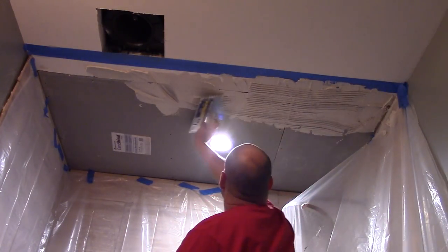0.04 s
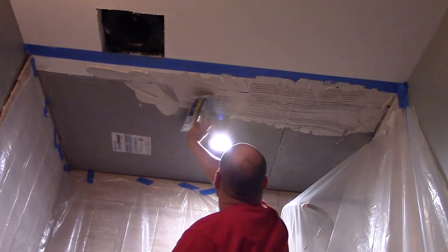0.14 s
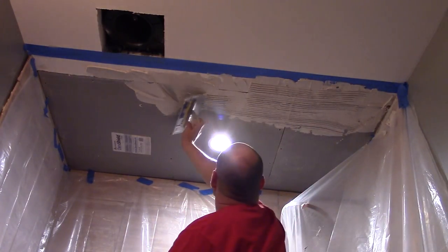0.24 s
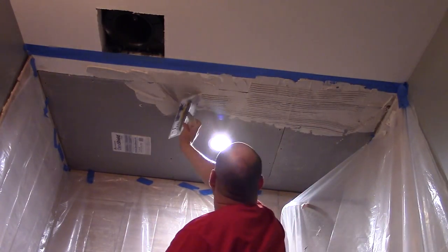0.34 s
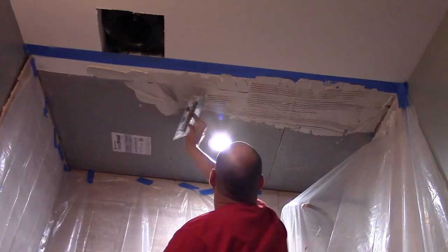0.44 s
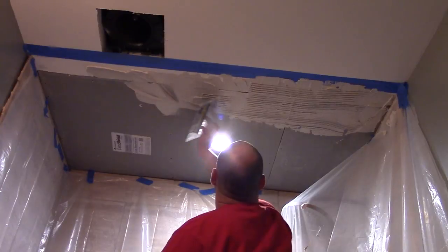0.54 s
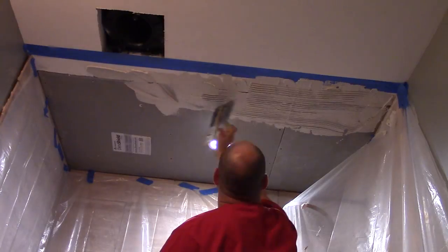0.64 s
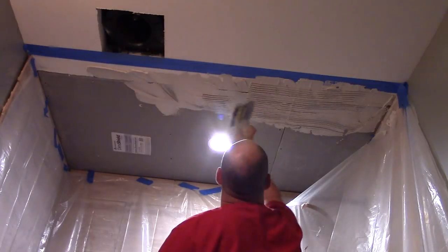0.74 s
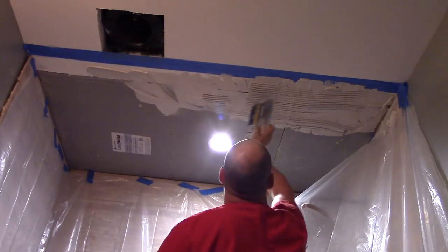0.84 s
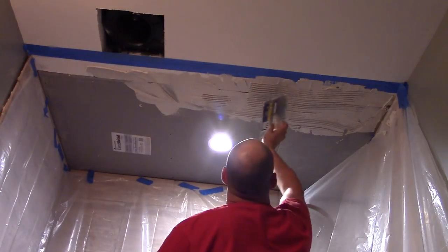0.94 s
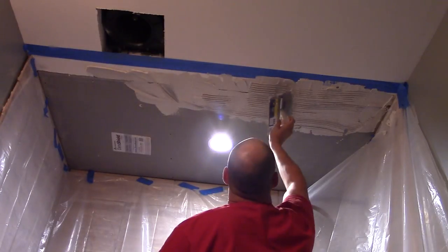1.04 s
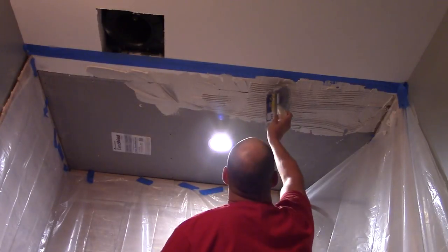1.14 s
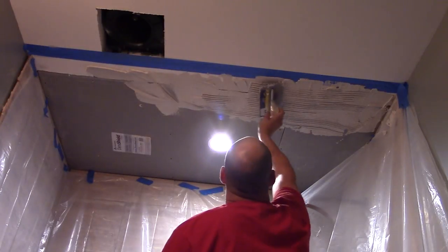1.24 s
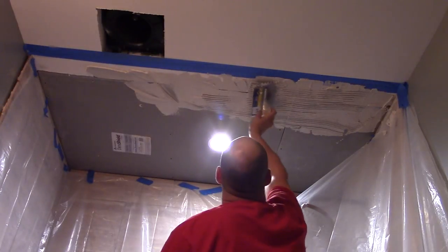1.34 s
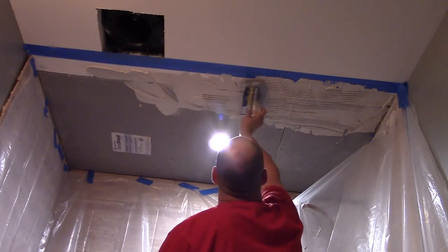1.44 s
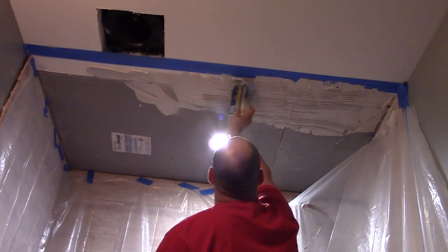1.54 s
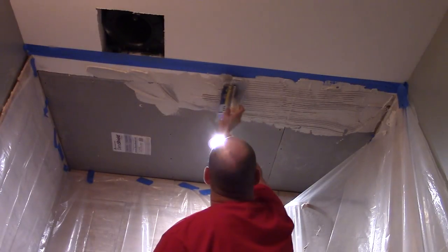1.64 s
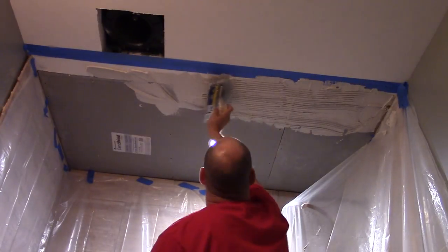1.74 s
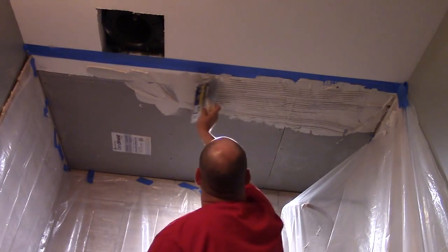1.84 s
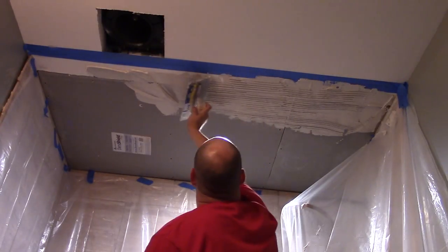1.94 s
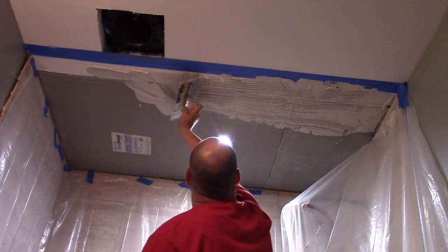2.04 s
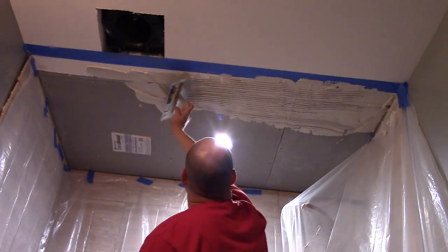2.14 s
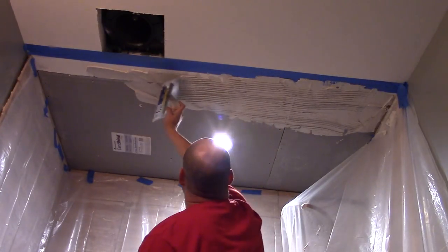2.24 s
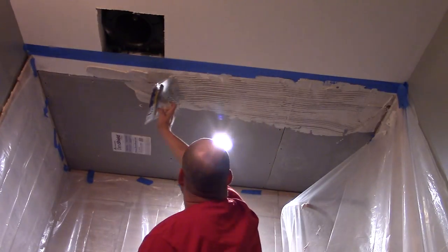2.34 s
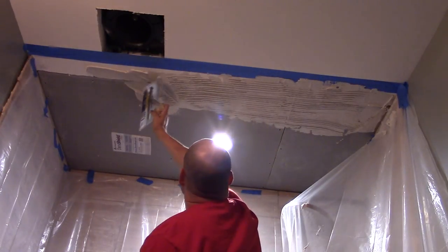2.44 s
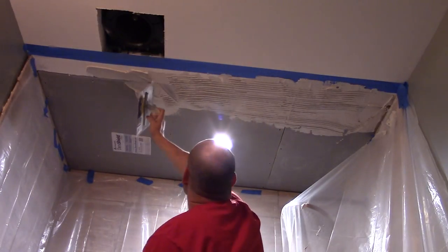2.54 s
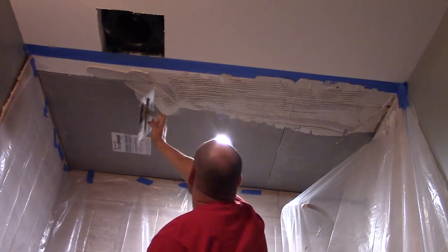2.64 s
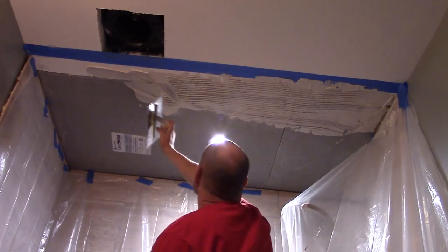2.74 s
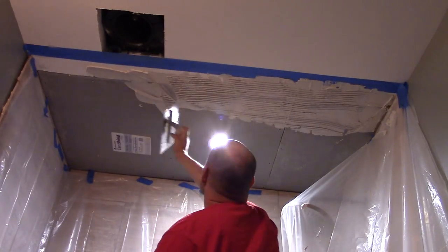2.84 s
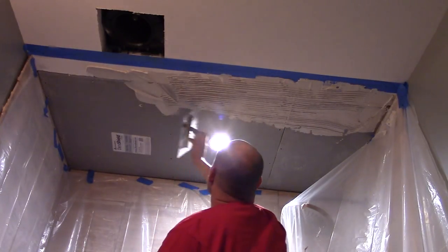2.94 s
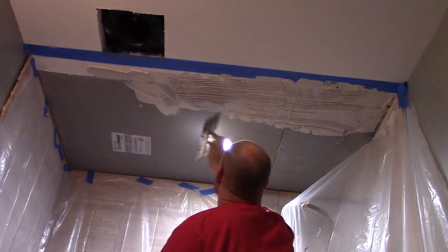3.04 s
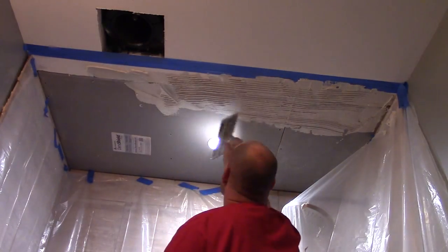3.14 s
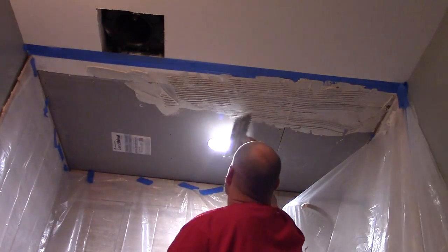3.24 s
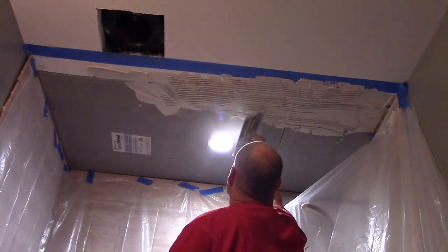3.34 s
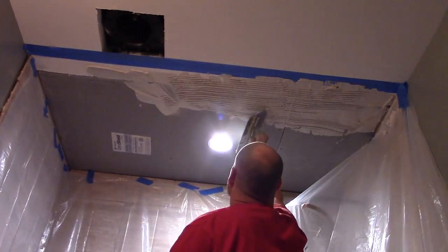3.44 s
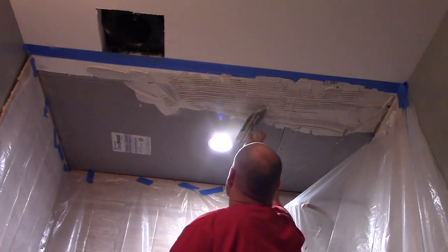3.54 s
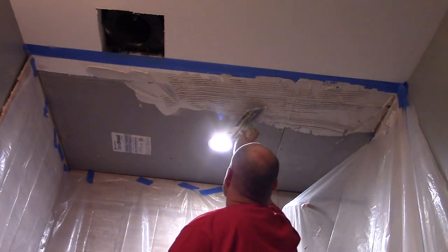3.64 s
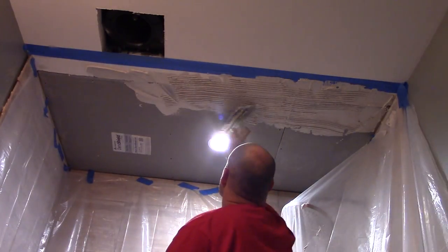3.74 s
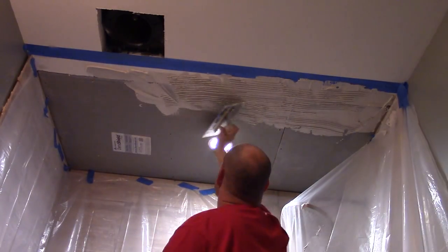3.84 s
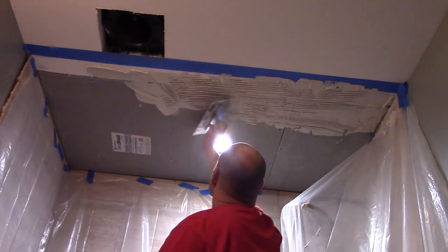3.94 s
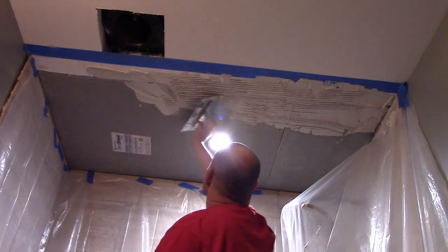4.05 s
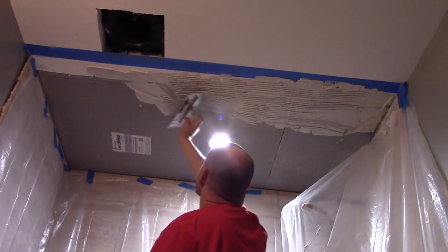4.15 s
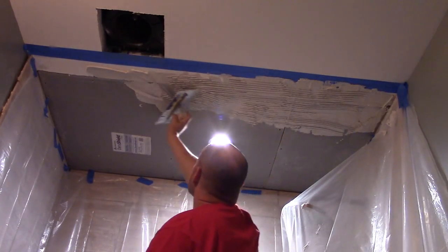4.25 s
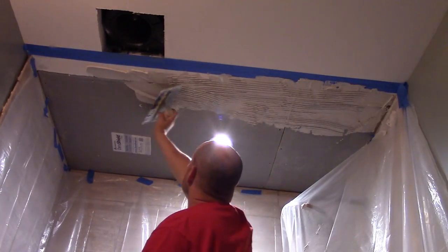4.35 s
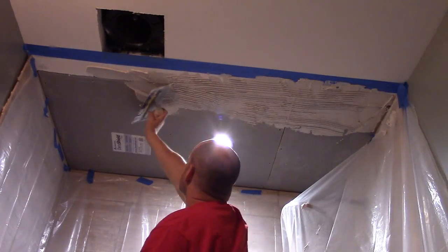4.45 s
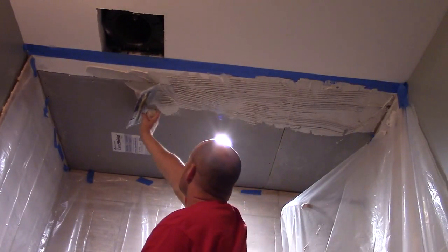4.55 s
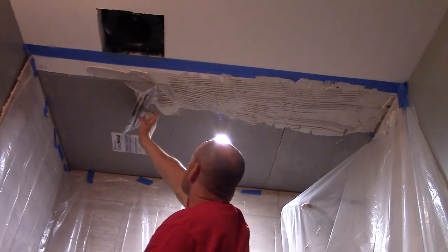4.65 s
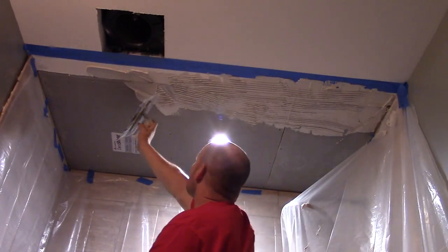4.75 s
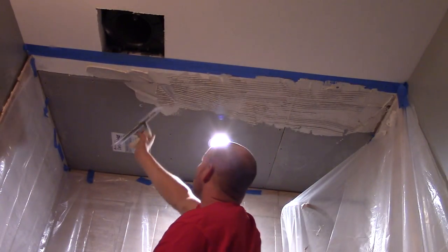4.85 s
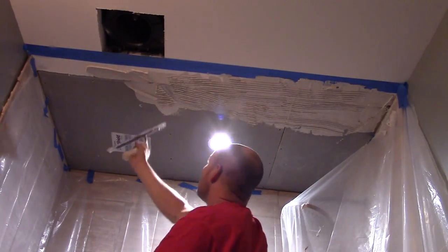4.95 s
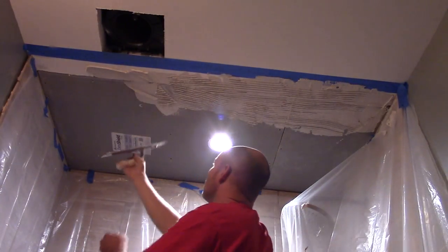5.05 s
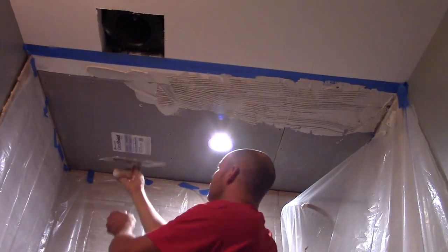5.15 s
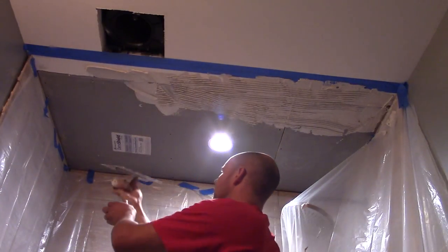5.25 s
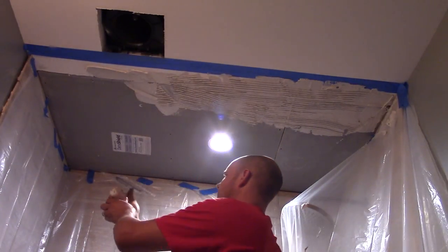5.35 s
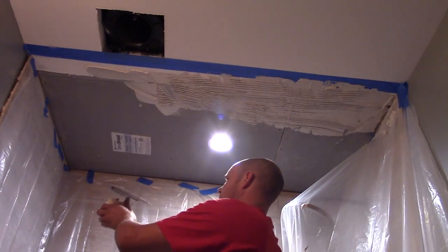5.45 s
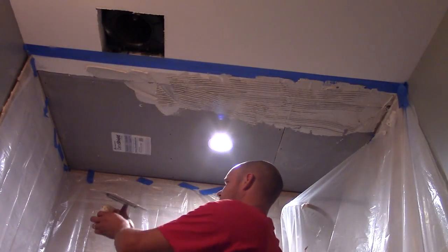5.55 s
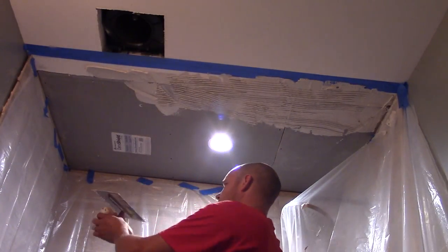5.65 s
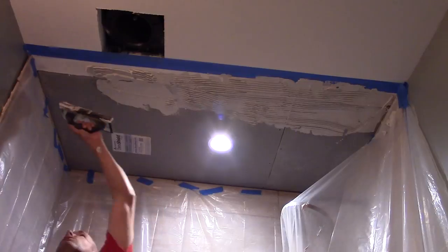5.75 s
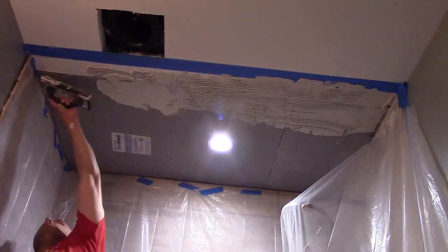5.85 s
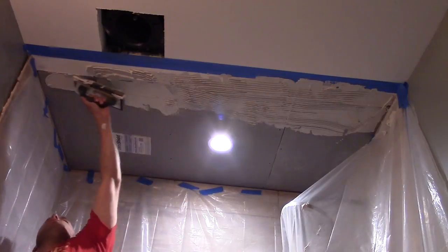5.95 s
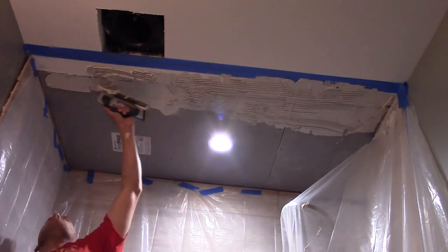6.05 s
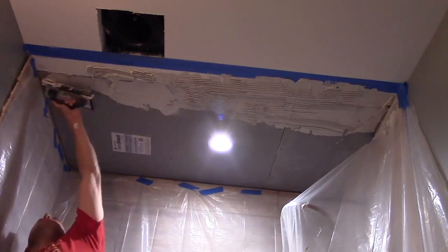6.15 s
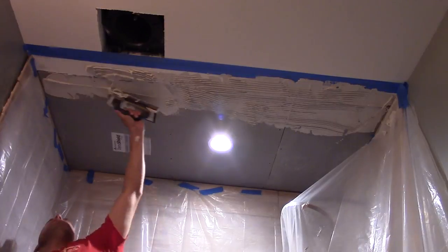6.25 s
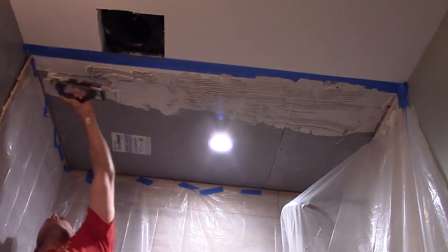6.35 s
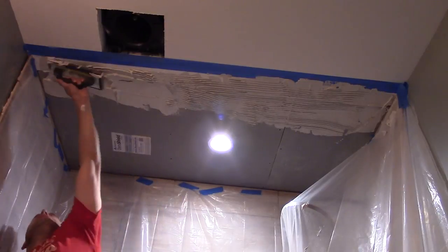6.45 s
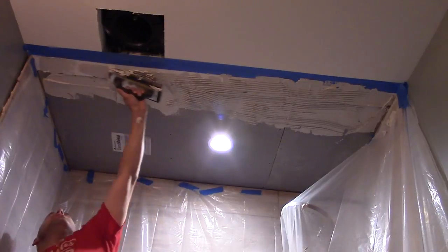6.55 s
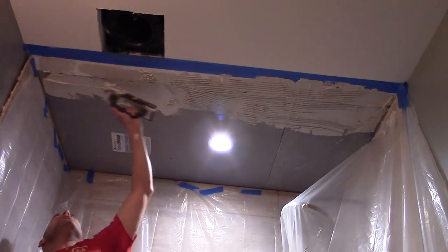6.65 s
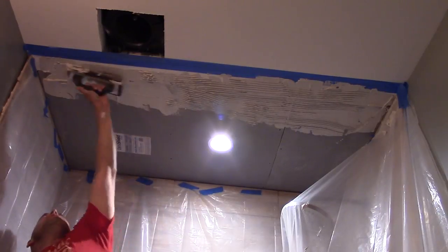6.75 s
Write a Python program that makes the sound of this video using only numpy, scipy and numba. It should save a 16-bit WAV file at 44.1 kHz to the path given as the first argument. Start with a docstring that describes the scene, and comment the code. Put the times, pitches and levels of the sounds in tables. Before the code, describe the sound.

Indoor work sound: coarse, sandy trowel scraping with a metallic midrange ring and boxy board resonance, each stroke fading into a thinner singing lift. Wet crackling smacks and blade touches fill the pauses over soft, steady duct air. After the third stroke come a few more touches, then an abrupt switch to sped-up sound, pitched-up airy hiss and very short irregular rasps. Close hard walls, modest distance, little stereo width.

```python
"""Wet mortar is spread with a notched steel trowel on a ceiling board in a small bathroom.
Low ventilation rush, coloured noise with duct resonances, runs throughout, with a faint high whine until the cut.
Three strokes: sand clicks under the teeth rasp, ring the blade and drum the board; noise bursts smack between.
At 5.75 s a hard cut to fast-forward: higher-pitched rush, scrapes shrunk to brief bright rasps."""
import sys
import numpy as np
from scipy import signal
from scipy.fft import rfft, irfft
from scipy.io import wavfile
from scipy.ndimage import uniform_filter1d
from numba import njit

SR = 44100
rng = np.random.default_rng(int(sys.argv[2]) if len(sys.argv) > 2 else 0)


def output_pcm(signal):
    """Save a mono or channel-first signal as 16-bit PCM at the path in sys.argv[1].

    Samples are clipped to [-1, 1] before scaling.
    """
    pcm = np.clip(np.atleast_2d(signal).T, -1, 1) * 32767
    wavfile.write(sys.argv[1], SR, np.round(pcm).astype(np.int16))


N = 299439
T = np.arange(N) / SR
HZ = np.maximum(np.arange(N + 1) * SR / (2 * N), 1)

# Spectral tables feed power-normalized filters: only their relative levels count.
# ventilation rush, normal and fast-forward: (frequency [Hz], density [dB per Hz])
RUSH_SPECTRUM = [(25, -42), (45, -52), (70, -17.5), (95, -13), (125, -6), (190, -3.5), (300, -1.5),
                 (450, -4), (750, -9.5), (1100, -17.5), (2000, -26.5), (3800, -31), (7000, -40),
                 (16000, -50)]
FAST_RUSH_SPECTRUM = [(30, -40), (150, -37), (230, -42), (340, -18), (480, -22), (620, -3.5), (950, -6.5),
                      (1150, -3.5), (2200, -4.5), (2700, -9), (3550, -9), (4000, -13.5), (6300, -22),
                      (12000, -29.5), (16000, -28)]
# duct resonances before pitch scaling: (frequency [Hz], width [Hz], relative level [dB])
DUCT_MODES = [(72, 24, -15.5), (125.8, 13.4, -12), (162.4, 14.2, -3), (192.1, 11.3, 0.5), (276.3, 20, -7),
              (429, 38, -13), (702, 25, -12)]
RUSH_DB, FAST_RUSH_DB = -43, -39  # before the air and duct gains
WHINE_HZ, WHINE_DB = 10960, -85
# side signal of trowel, rush and fast rush: (frequency [Hz], side re mid [dB])
TROWEL_SIDE = [(60, -22), (110, -24), (200, -33), (380, -32.5), (700, -30.5), (1290, -30), (2380, -28.5),
               (4400, -15), (8120, -13), (15000, -12.5)]
RUSH_SIDE = [(70, -15), (130, -21.5), (700, -19), (1800, -11), (7000, -11.5), (12000, -17)]
FAST_RUSH_SIDE = [(100, -6), (190, -9), (300, -25), (470, -11), (750, -26), (1900, -29), (4600, -24),
                  (7500, -15), (12000, -11)]

FAST_START_S, SPEED_UP = 5.749, 5
# fast-forward scrapes: (middle [s], half length [s], level [dB], tilt [dB per octave])
FAST_SCRAPES = [(5.768, 0.022, -42, -1), (5.821, 0.022, -36, 2), (5.881, 0.021, -34.5, 0),
                (5.93, .025, -47, -2), (6.028, 0.02, -42, -6.5), (6.06, .012, -43, 7),
                (6.157, .005, -43, 1), (6.3, 0.021, -29.5, -4), (6.568, 0.013, -26.5, -4),
                (6.614, 0.012, -37.5, -5), (6.64, 0.055, -41, -6.5)]

# board flexing under the hand: (middle [s], half length [s], level [dB], frequency [Hz])
FLEXES = [(1.79, .05, -47, 80), (1.85, 0.54, -51, 143), (1.95, 0.38, -45.5, 231), (2.0, .5, -57, 80),
          (2.453, 0.051, -38.5, 150)]

# mortar smacks, light blade touches: (time [s], drive peak [dB], centre [Hz], decay [s])
SMACKS = [(0.9444, -46, 2790, .018), (0.9824, -43, 3370, 0.059), (1.061, -34.5, 3880, 0.027),
          (1.211, -29, 2400, 0.051), (2.704, -34, 3750, 0.011), (3.193, -37.5, 4050, .016),
          (3.225, -29, 5200, .011), (3.2854, -32.5, 5330, 0.018), (3.4164, -37, 2310, 0.02),
          (3.449, -28, 5770, 0.031), (3.595, -24.5, 2910, 0.011), (3.6416, -28, 5230, 0.0092),
          (4.7614, -23, 5700, .015), (4.9472, -38.5, 2170, 0.024), (5.168, -34.5, 3080, .015),
          (5.532, -35.5, 3630, 0.013)]
# smack crackle colour: (frequency [Hz], density [dB per Hz])
SMACK_SPECTRUM = [(500, 7.5), (1200, 0.5), (2500, 0), (4500, -3.5), (5700, -3.5), (8000, -7),
                  (12000, -13.5), (16000, -22)]
SMACK_RISE_S, SQUELCH_GAIN = 0.0058, 0.46

# scrape colours, teeth, fine hiss and board: (frequency [Hz], density [dB per Hz])
RASP_SPECTRUM = [(900, -43), (1500, 0.5), (1950, -2), (2130, -2), (2500, 0.5), (3200, -0.5), (3850, -0.5),
                 (4200, -3), (4350, -3.5), (5600, -14.5), (8000, -28.5)]
HISS_SPECTRUM = [(3500, -27), (5200, -2.5), (6300, 0.5), (7400, -1), (9000, -7), (11300, -6.5),
                 (13800, -15.5), (16000, -19)]
BOARD_SPECTRUM = [(30, -58), (55, -38), (80, -27), (110, -32), (160, -20), (235, -10), (420, -3.5),
                  (530, -2), (760, 2.5), (950, 1.5), (1300, 0), (2200, -25)]
# narrow resonances of board and alcove before pitch scaling: (frequency [Hz], relative level [dB])
BOARD_MODES = [(268, -5), (325, -6), (392, 0.5), (450, 2.5), (620, 3), (715, -4), (780, 6), (838, 0.5),
               (894, -9), (924, 6), (988, 0), (1115, 0), (1165, 4)]
# hollow board note, left when the hand lets up
HOLLOW_HZ, HOLLOW_WIDTH_HZ, HOLLOW_DB = 427, 200, 1
# blade bending modes: (multiple of blade resonance [-], width before damping [Hz], level [dB])
BLADE_MODES = [(0.931, 113.4, 0), (0.997, 89.8, 1.5), (1.081, 130, 1), (2.1, 260, -17), (3.5, 220, -17.5)]
BLADE_WANDER = .02  # relative detuning by the grip

# strokes: (teeth bite [s], attack [s], hand eases [s], release [s], hiss drive re pressure [dB],
#           blade resonance off the paste [Hz], extra ring on lifting [dB])
STROKES = [(0.0, .01, 0.33, 0.19, -1.5, 1286, 15), (1.303, 0.02, 2.4274, 0.24, -3, 1234, 8.5),
           (3.764, .17, 4.62, .25, -5, 1185, 6)]
# hand curve of each stroke:
# (time [s], pressure [dB], board drive re pressure [dB], held blade resonance [Hz])
HAND_1 = [(0.0, -18.5, -2.5, 1320), (0.044, -21, -1, 1212), (0.236, -25, -5, 1256),
          (0.324, -23.5, -5, 1325), (0.345, -21.5, -4.5, 1240)]
HAND_2 = [(1.32, -30, -2, 1250), (1.364, -29, -5, 1300), (1.586, -26.5, -4, 1250), (1.74, -23.5, -5, 1337),
          (1.854, -19.5, -5.5, 1297), (1.974, -23.5, -4.5, 1220), (2.206, -22, -2, 1230),
          (2.342, -23, -3.5, 1146), (2.4, -23.5, -2, 1350)]
HAND_3 = [(3.77, -20, -7, 1167), (3.842, -19.5, -4, 1196), (3.98, -23, -0.5, 1190),
          (4.138, -22, -3.5, 1278), (4.236, -21, -5, 1240), (4.324, -21.5, -5, 1365),
          (4.416, -19.5, -4.5, 1150), (4.62, -27, -3, 1247)]
# teeth skimming the paste:
# (middle [s], half length [s], rasp drive [dB], ring drive re rasp [dB], blade resonance [Hz])
SKIMS = [(1.25, .037, -39, -2, 1596), (3.684, 0.042, -47, 6, 1185), (4.777, 0.028, -42, -13, 1190)]
CONTACT_RANGE_DB, RELEASE_EXPONENT = 40.5, 1.38  # drop per attack or release time; slow start of lift
BOARD_LINGER_DB, HISS_LOSS_DB = 9.5, -7  # re pressure over one release, as the blade slows
REGRIP_S = 0.037  # held pitch to free pitch
FREED_SHARE = 0.53  # share of the release the steel takes to come free
RING_OFFSET_DB = 1.5  # ring drive re board drive
RING_DAMPING, FIRM_DB = 0.28, -24  # dB soaked up by the paste per dB of pressure above FIRM_DB
LANDING_S, LANDING_DB = 1.299, -31  # blade set flat on the board; drive level
RASP_DB = 0.54
TOP_HZ = 15900


def undb(db):
    """Decibels to gain."""
    return 10 ** (np.asarray(db) / 20)


def unit(x):
    """Scale to rms 1."""
    return x / np.sqrt(np.mean(x ** 2))


def shape(points):
    """Gain over HZ, interpolated in dB on log frequency."""
    hz, db = np.transpose(points)
    return undb(np.interp(np.log(HZ), np.log(hz), db))


def resonance(hz, width_hz):
    """Response of one damped mode, 1 at its centre."""
    return 1 / (1 + 1j * (HZ / hz - hz / HZ) * hz / width_hz)


def colour(x, response):
    """Filter by a frequency response."""
    return irfft(rfft(x, 2 * N) * response)[:N]


def radiate(x, response):
    """Colour a broadband drive, keeping its power."""
    return colour(x, response / np.sqrt(np.mean(np.abs(response) ** 2)))


def walk(rate_hz):
    """Random levels held 1 / rate_hz s, smoothed twice; spread near 1."""
    hold = int(SR / rate_hz)
    steps = np.repeat(rng.standard_normal(N // hold + 1), hold)
    return 1.3 * uniform_filter1d(uniform_filter1d(steps, hold), hold)[:N]


def swell(middle_s, half_s):
    """Bell-shaped rise and fall."""
    return np.exp(-((T - middle_s) / half_s) ** 2)


@njit
def moving_band(x, hz, width_hz):
    """State-variable band-pass whose centre moves every sample."""
    y, band, low = np.empty(len(x)), 0., 0.
    for i in range(len(x)):
        g, k = np.tan(np.pi * hz[i] / SR), width_hz / hz[i]
        v = (band + g * (x[i] - low)) / (1 + g * (g + k))
        band, low, y[i] = 2 * v - band, low + 2 * g * v, k * v
    return y


def grit(rate_hz, spread_db, paste=0.36):
    """Randomly timed clicks of uneven sand grains over the smooth noise of smeared paste."""
    size = undb(spread_db * np.minimum(rng.exponential(size=N), 5))
    clicks = (rng.random(N) < rate_hz / SR) * size * rng.choice([-1, 1], N)
    return unit(unit(clicks) + paste * rng.standard_normal(N))


def room(x, t60_s=.3, gap_s=.004, size=8192):
    """Short dense tail of close bare walls; its pattern changes as hand and body move."""
    t = T[:SR // 2]
    decay = undb(-60 * t / t60_s) * (t > gap_s)
    window = np.sin(np.pi * np.arange(size) / size)
    padded = np.pad(x, (size, 2 * size + len(t)))
    out = np.zeros(len(padded))
    # a fresh tail for every half-overlapped block
    for i in range(0, N + size, size // 2):
        echo = signal.fftconvolve(padded[i:i + size] * window, decay * rng.standard_normal(len(t)))
        out[i:i + len(echo)] += echo
    return out[size:size + N] / np.sqrt(np.sum(decay ** 2))


def indoors(x, t60_s, wet_db):
    """Direct sound plus room tail, at the same total power."""
    return (x + undb(wet_db) * room(x, t60_s)) / np.sqrt(1 + undb(wet_db) ** 2)


def spread(mid, side_levels):
    """Add a faint, diffuse side signal, with its level set per frequency."""
    side = colour(room(mid, t60_s=.13, gap_s=.0005, size=4096), shape(side_levels))
    return np.array([mid + side, mid - side])


def rush(spectrum, pitch, air_db, duct_db):
    """Moving air as slowly varying noise, plus noise through pitch-scaled duct resonances."""
    duct = sum(undb(db) * resonance(hz * pitch, width_hz * pitch) ** 2
               for hz, width_hz, db in DUCT_MODES)
    level = undb(air_db + 0.61 * walk(5.2))
    air = level * radiate(rng.standard_normal(N), shape(spectrum))
    return air + undb(duct_db) * radiate(rng.standard_normal(N), duct)


def whine():
    """Faint electronic whine: very narrow noise high in the treble, wavering."""
    return undb(WHINE_DB) * radiate(rng.standard_normal(N), resonance(WHINE_HZ, 300) ** 2)


def board_modes(pitch):
    """Summed response of the board and alcove modes, pitch-scaled."""
    return sum(undb(db) * resonance(hz * pitch, 26 * pitch) ** 2 for hz, db in BOARD_MODES)


def fast_scrapes(low_hz=1300):
    """Sped-up scrapes: brief rasps, board modes pitched up, room tail shrunk."""
    out = 0
    sand = grit(rate_hz=5000, spread_db=0.5)
    low_cut = 1 / (1 + (low_hz / HZ) ** 4)
    body = (1 + 0.39 * np.abs(board_modes(SPEED_UP))) * low_cut
    for s, half_s, db, tilt_db in FAST_SCRAPES:
        tilt = undb(tilt_db * np.log2(HZ / low_hz))
        out = out + undb(db) * radiate(sand * swell(s, half_s), body * tilt)
    return indoors(out, t60_s=0.025, wet_db=-8)


def flex(width_hz=29.0):
    """Low groans of the board bending under the hand: swelling narrow-band noise."""
    out = 0
    for s, half_s, db, hz in FLEXES:
        groan = radiate(rng.standard_normal(N), resonance(hz, width_hz) ** 2)
        out = out + undb(db) * swell(s, half_s) * groan
    return out


def smacks(squelch_width_hz=2200.):
    """Mortar leaves the steel in short crackles; the closing pocket adds a band-passed squelch."""
    crackles, squelches = 0, 0
    crackle = grit(rate_hz=2500, spread_db=2.5, paste=0.63)
    for s, db, hz, decay_s in SMACKS:
        age = np.where(T < s, (s - T) / SMACK_RISE_S, (T - s) / decay_s)
        burst = crackle * undb(db) * np.exp(-np.minimum(age, 20))
        centre_hz = np.full(N, float(hz))
        crackles = crackles + moving_band(burst, centre_hz, 27000.0)
        squelch = moving_band(burst, centre_hz, squelch_width_hz)
        squelches = squelches + moving_band(squelch, centre_hz, squelch_width_hz)
    crackles = indoors(radiate(crackles, shape(SMACK_SPECTRUM)), t60_s=0.5, wet_db=-2.5)
    squelches = indoors(squelches, t60_s=0.1, wet_db=-3)
    return undb(-8.5) * crackles + SQUELCH_GAIN * squelches


def strokes():
    """Bite, hand curve and lift of each stroke; on lifting the rasp fades first, board and steel later."""
    controls = np.zeros((5, N))
    for stroke, hand in zip(STROKES, (HAND_1, HAND_2, HAND_3)):
        bite_s, attack_s, ease_s, release_s, hiss_db, free_hz, sing_db = stroke
        s, *columns = np.transpose(hand)
        pressure_db, board_db, held_hz = (np.interp(T, s, column) for column in columns)
        approach = np.clip((bite_s - T) / attack_s, 0, None)
        lift = np.clip((T - ease_s) / release_s, 0, None) ** RELEASE_EXPONENT
        slowed = np.minimum(lift, 1)
        freed = np.clip((T - ease_s) / (FREED_SHARE * release_s), 0, 1)
        loose = np.clip(np.maximum(bite_s - T, T - ease_s) / REGRIP_S, 0, 1)
        pressure = undb(pressure_db - CONTACT_RANGE_DB * (approach + lift))
        soaked_db = RING_DAMPING * (pressure_db - FIRM_DB)
        ring_db = board_db + RING_OFFSET_DB + sing_db * freed - soaked_db
        blade_hz = held_hz + (free_hz - held_hz) * loose
        current = np.array([pressure, board_db + BOARD_LINGER_DB * slowed, ring_db,
                            hiss_db + HISS_LOSS_DB * slowed, blade_hz])
        # the strongest stroke rules
        controls = np.where(pressure >= controls[0], current, controls)
    return controls


def blade(blade_hz, load, damping=1.06, free=0.54):
    """Steel modes driven by grit: broad when pressed into paste, narrow and singing when eased off."""
    out = 0
    for multiple, width_hz, db in BLADE_MODES:
        hz = multiple * blade_hz
        pressed_hz, eased_hz = damping * width_hz, free * width_hz
        pressed = moving_band(grit(rate_hz=2000, spread_db=2.0), hz, pressed_hz)
        pressed = moving_band(pressed, hz, pressed_hz)
        eased = moving_band(grit(rate_hz=1800, spread_db=2.5), hz, eased_hz)
        eased = moving_band(eased, hz, eased_hz)
        out = out + undb(db) * (np.sqrt(load) * unit(pressed) + np.sqrt(1 - load) * unit(eased))
    return unit(out)


def trowel():
    """Teeth catch and slip on sand; the juddering force rasps, rings the blade and shakes the board."""
    pressure, board_db, ring_db, hiss_db, blade_hz = strokes()
    judder = undb(0.55 * walk(170) + 0.63 * walk(35))
    force = pressure * judder

    skim, skim_ring = 0, 0
    for s, half_s, db, skim_ring_db, hz in SKIMS:
        touch = swell(s, half_s)
        skim = skim + undb(db) * touch * judder
        skim_ring = skim_ring + undb(db + skim_ring_db) * touch
        blade_hz = blade_hz + (hz - blade_hz) * touch

    landing_decay = (T >= LANDING_S) * np.exp(-np.abs(T - LANDING_S) / 0.012)
    landing = undb(LANDING_DB) * landing_decay * rng.standard_normal(N)

    rasp_drive = grit(rate_hz=5000, spread_db=0.5, paste=0.7) * (force + skim)
    rasp = radiate(rasp_drive + 0.59 * landing, shape(RASP_SPECTRUM))
    hiss_force = force * undb(hiss_db) + undb(-3.0) * skim
    hiss_drive = grit(rate_hz=6000, spread_db=0, paste=0.35) * hiss_force
    hiss = radiate(hiss_drive + 0.78 * landing, shape(HISS_SPECTRUM))

    # a skim slides on the paste and moves the board less
    board_force = force * undb(board_db)
    thrust = board_force + undb(-6) * skim
    load = pressure ** 2 / (pressure ** 2 + undb(-28) ** 2)
    slack = 1 / (1 + (pressure / undb(-33)) ** 4)
    drum_drive = grit(rate_hz=2500, spread_db=2.0, paste=0.24) * thrust * (1 - 0.38 * slack)
    drumming = radiate(drum_drive + landing, shape(BOARD_SPECTRUM))
    hollow_drive = grit(rate_hz=3000, spread_db=0.5) * board_force * slack
    hollow = radiate(hollow_drive, resonance(HOLLOW_HZ, HOLLOW_WIDTH_HZ) ** 2)
    boom_drive = grit(rate_hz=2500, spread_db=4.0) * thrust * (1 - 0.49 * slack)
    boom = radiate(boom_drive, board_modes(0.99))

    wandering_hz = blade_hz * (1 + BLADE_WANDER * walk(12))
    ring = blade(wandering_hz, load) * (force * undb(ring_db) + skim_ring)
    teeth = undb(RASP_DB) * rasp + undb(-0.63) * hiss
    board = undb(-1.0) * drumming + undb(HOLLOW_DB) * hollow + undb(-2.5) * boom
    return teeth + board + undb(0.17) * ring


def scene():
    """Work at normal speed, then a hard cut to fast-forward."""
    air = undb(RUSH_DB) * rush(RUSH_SPECTRUM, 0.97, air_db=-2.5, duct_db=-6.5) + whine()
    work = indoors(trowel() + flex(), t60_s=0.29, wet_db=-7.5) + smacks()
    normal = spread(air, RUSH_SIDE) + spread(work, TROWEL_SIDE)

    fast_air = undb(FAST_RUSH_DB) * rush(FAST_RUSH_SPECTRUM, SPEED_UP, air_db=-1.7, duct_db=-5)
    fast_side = [(hz * SPEED_UP, db) for hz, db in TROWEL_SIDE]
    fast = spread(fast_air, FAST_RUSH_SIDE) + spread(fast_scrapes(), fast_side)
    return np.where(T < FAST_START_S, normal, fast)


def record(dry):
    """Round the highest peaks, then cut steeply above TOP_HZ."""
    rounded = dry / (1 + (dry / .62) ** 6) ** (1 / 6)
    return signal.sosfilt(signal.ellip(10, .2, 80, TOP_HZ, fs=SR, output="sos"), rounded)


dry = scene()
out = record(dry)
output_pcm(out)
```